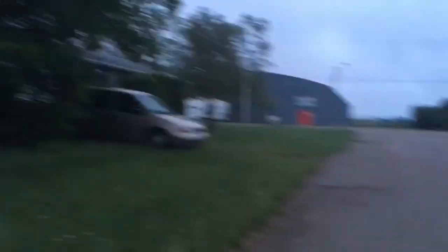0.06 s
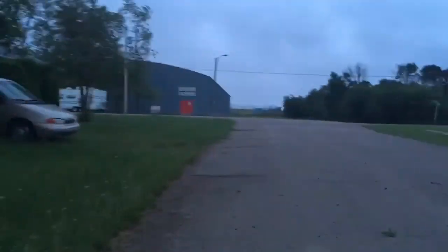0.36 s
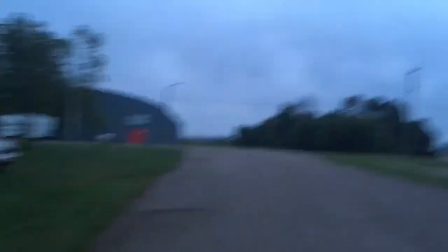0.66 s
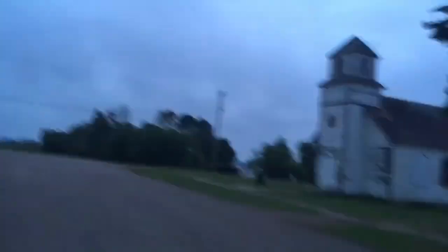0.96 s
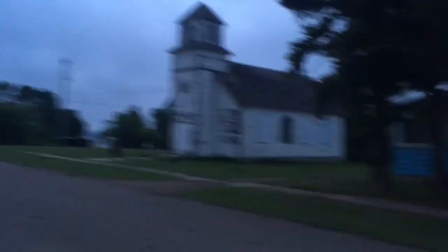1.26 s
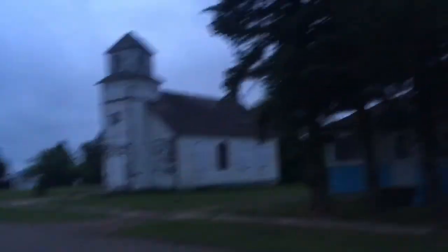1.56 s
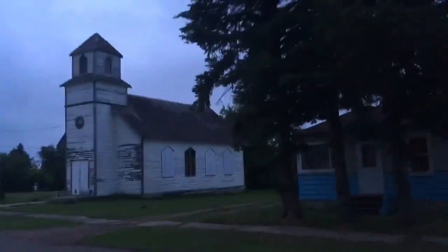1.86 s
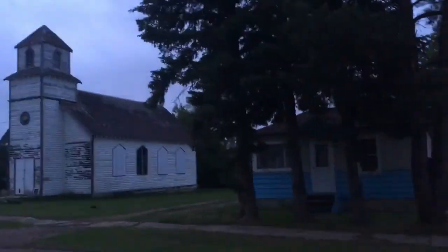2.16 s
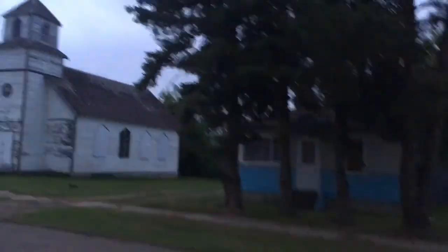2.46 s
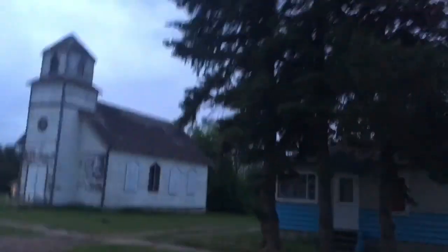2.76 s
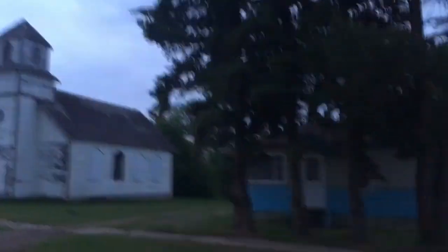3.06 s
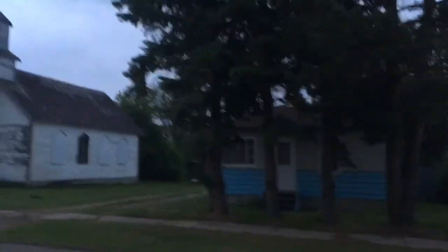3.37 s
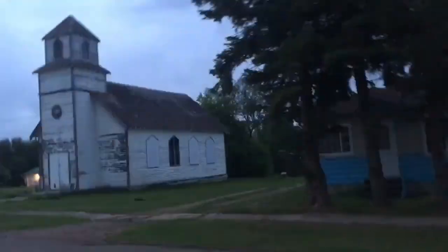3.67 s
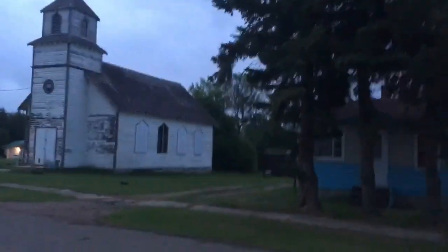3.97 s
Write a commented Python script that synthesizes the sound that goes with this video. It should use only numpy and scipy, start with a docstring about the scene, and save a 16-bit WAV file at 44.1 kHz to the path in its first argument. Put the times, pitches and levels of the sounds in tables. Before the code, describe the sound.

Gusty wind rumbles and thumps on the microphone, with trees rustling behind it.

```python
"""Two hard knocks and a low rumble come first: wind buffets a small mono microphone near the ground.
The rumble breaks into a rough flutter in the stronger puffs, and single eddies thump on the port.
Behind this the same gust builds in tall conifers and leafy trees: boughs roar, needles hiss and
leaves rustle, then it eases a little."""
import sys
import numpy as np
from scipy import signal
from scipy.fft import rfft, irfft
from scipy.io import wavfile
from scipy.ndimage import uniform_filter1d

SR = 44100
rng = np.random.default_rng(int(sys.argv[2]) if len(sys.argv) > 2 else 0)


def master(y):
    """Save y as 16-bit WAV."""
    cut = np.clip(np.atleast_2d(y).T, -1, 1)
    pcm = np.round(cut * 32767)  # scale
    wavfile.write(sys.argv[1], SR, pcm.astype(np.int16))


N = 176400


def buffeting():
    """Turbulent pressure on the port: a puffing rumble, a ragged flutter and one hollow burble."""
    # strength of the buffeting: t/s, rumble level/dB, flutter level/dB
    strength = [(0, -32, -38), (.06, -22, -34.5), (.11, -28.5, -35.5), (.2, -37.5, -54), (.325, -36.5, -55),
                (.357, -24, -31), (.385, -38, -49), (.6, -36, -56.5), (.94, -37, -52), (.975, -27.5, -29),
                (1.015, -31.5, -39), (1.12, -31, -42), (1.18, -24, -35.5), (1.24, -29, -36),
                (1.275, -24, -31), (1.31, -22, -27), (1.355, -32, -47.5), (1.39, -33.5, -32),
                (1.44, -27.5, -30), (1.485, -36, -48), (1.555, -43, -41), (1.6, -26, -27),
                (1.635, -42, -45), (1.662, -25, -26), (1.72, -34, -40.5), (1.752, -21, -26),
                (1.79, -24, -31), (1.837, -31, -65), (1.865, -33, -25.5), (1.92, -28, -39),
                (1.96, -23, -31.5), (2, -32, -30.5), (2.09, -29, -45), (2.15, -26.5, -33.5),
                (2.205, -40, -67), (2.275, -34, -36), (2.375, -30.5, -41.5), (2.45, -27.5, -54),
                (2.49, -38, -48), (2.69, -34.5, -54), (2.765, -30, -39), (2.795, -24, -64),
                (2.85, -47, -64), (3.13, -37.5, -48), (3.39, -41.5, -55), (3.44, -20.5, -32.5),
                (3.52, -33, -43), (3.67, -32, -40), (3.715, -44, -56), (3.91, -46.5, -59),
                (3.965, -26.5, -48), (4, -34.5, -68)]
    # spectra of the three pressure fluctuations: f/Hz, relative spectral level/dB
    rumble_colour = [(30, -63), (43, 2), (76, 6.5), (120, -2.5), (220, -7), (320, -14.5), (500, -27.5),
                     (1000, -64)]
    flutter_colour = [(80, -65), (200, 1), (320, 0.5), (520, 0), (700, -7.5), (900, -14.5), (1300, -19),
                      (2000, -26), (3500, -69)]
    burble_colour = [(90, -7), (160, 2.5), (205, 3), (290, -7), (400, -6.5), (520, -16), (900, -53)]
    t = np.arange(N) / SR
    rumble_db, flutter_db = curves(strength)
    puffs = unit(undb(4.5 * np.tanh(2 * drift(50))))
    rumble = steady(noise(rumble_colour)) * puffs * undb(rumble_db + 2.5)
    roughness = undb(4.5 * drift(220))
    flutter = steady(noise(flutter_colour) * roughness) * undb(flutter_db + 1.5)
    # the port burbles while the air blows straight across it
    start_s, end_s, fade_s = 3.43, 3.695, 0.022
    crossflow = np.clip(np.minimum(t - start_s, end_s - t) / fade_s, 0, 1)
    burble = steady(noise(burble_colour)) * crossflow * undb(-25)
    return rumble + flutter + burble


def eddies():
    """Convected vortices: each pushes, then sucks at the port; small ones pass faster and sound higher."""
    # eddies that hit the port: t/s, f/Hz, peak level/dB
    passages = [(0.063, 332, -12), (0.0806, 119, -15.5), (.189, 115, -22), (.23, 177, -20.5),
                (0.283, 156, -26.5), (.371, 92.5, -18.5), (.42, 177, -23.5), (.459, 143, -21.5),
                (0.5187, 146, -21.5), (0.586, 92, -20), (0.6955, 207, -25.5), (0.9709, 554, -22),
                (1.176, 330, -19), (1.184, 139, -15), (1.196, 444, -18.5), (1.2069, 436, -17),
                (1.2714, 206, -10.5), (1.316, 304, -9), (1.328, 123, -11.5), (1.5983, 262, -13.5),
                (1.6544, 350, -17), (1.704, 156, -15.5), (1.7332, 400, -14), (1.7629, 142, -11.5),
                (1.778, 567, -13), (1.7946, 590, -7), (1.862, 600, -17.5), (1.9931, 380, -14),
                (2.047, 226, -17), (2.585, 82, -13), (2.764, 525, -19), (2.768, 186, -15.5),
                (3.297, 151, -24.5), (3.347, 164, -28), (3.48, 242, -13.5), (3.5612, 195, -13),
                (3.6305, 208, -9.5)]
    falloff = 4.1  # how steeply the pressure dies away from the core
    t, out = np.arange(N) / SR, np.zeros(N)
    for at, hz, peak_db in passages:
        near = np.abs(t - at) < 2 / hz
        cycles = hz * (t[near] - at)
        pressure = -np.sin(2 * np.pi * cycles) / (1 + cycles ** 2) ** falloff
        out[near] += undb(peak_db) * pressure / np.abs(pressure).max()
    return out


def knocks():
    """Impulse response: each push rings the housing's damped modes, dull or bright by its band edge."""
    # knocks on the microphone: t/s, upper band edge f/Hz, peak level/dB
    pushes = [(0.0477, 895, -3), (0.0667, 1600, -2), (1.7912, 1900, -16.5)]
    # modes of its housing: f/Hz, decay time T60/s, relative level/dB
    modes = [(333, 0.017, -5.5), (565, 0.0048, 4), (1070, 0.0098, 0)]
    t, out = np.arange(N) / SR, np.zeros(N)
    for at, edge_hz, peak_db in pushes:
        age = np.clip(t - at, 0, .1)
        ring = sum(undb(db - 60 * age / t60) * np.sin(2 * np.pi * hz * age) for hz, t60, db in modes)
        band = signal.butter(4, [100, edge_hz], "band", fs=SR, output="sos")
        ring = signal.sosfilt(band, ring + 1e-18)
        out += undb(peak_db) * ring / np.abs(ring).max()
    return out


def trees():
    """Flow noise: boughs, needles and leaves each swell with the gust and flicker a little on their own."""
    # wind in the crowns: t/s, then relative level/dB of boughs, needles and leaves
    gust = [(0, -1, -14.5, -13.5), (.15, -8.5, -14, -14), (.55, -6, -14, -14), (.78, -4.5, -10.5, -14.5),
            (1.1, -5, -11, -13), (2.1, -1, -5.5, -5.5), (2.48, 0.5, -3.1, -1), (3.04, 0.9, -0.7, -0.5),
            (3.38, 2, -2.5, -3), (3.62, -1.5, -7, -6), (4, 1, -4.5, -4)]
    # where the band of each of the three has full weight: f/Hz
    band_hz = [1060, 2400, 9600]
    # spectrum of the trees: f/Hz, relative spectral level/dB
    colour = [(40, 0.5), (100, 4.5), (250, -5.5), (800, -5), (1700, -2), (2200, 0.5), (2600, 1.3),
              (2950, -2), (4000, -6), (4900, -11), (5400, -9), (6300, -8.5), (7600, -14.5), (9000, -13.5),
              (10400, -17), (11500, -15.5), (15500, -17)]
    base_db, flicker_db = -32.5, 0.64
    spectrum, out = rfft(noise(colour)), 0
    for gust_db, selector in zip(curves(gust), np.eye(len(band_hz))):
        weight = np.interp(log_bins(), np.log(band_hz), selector)  # neighbouring bands crossfade
        band = irfft(spectrum * weight, N)
        out = out + band * undb(base_db + gust_db + flicker_db * drift(60))
    return out


def undb(db):
    """Amplitude ratio of a level in decibels."""
    return 10 ** (np.asarray(db) / 20)


def unit(x):
    """Normalisation to an rms of 1."""
    return x / np.sqrt(np.mean(x ** 2))


def curves(table):
    """Linear interpolation in time of each column of a table."""
    times, *columns = np.array(table).T
    return [np.interp(np.arange(N) / SR, times, column) for column in columns]


def log_bins():
    """Logarithmic frequency of every spectral bin."""
    return np.log(np.maximum(np.fft.rfftfreq(N, 1 / SR), 1))


def noise(colour):
    """Spectral shaping of white noise through points of f/Hz, level/dB."""
    hz, db = np.array(colour).T
    gain = undb(np.interp(log_bins(), np.log(hz), db))
    return unit(irfft(rfft(rng.standard_normal(N)) * gain, N))


def drift(rate_hz):
    """Random modulation: smoothed steps with an rms of 1."""
    width = max(int(SR / rate_hz), 2)
    steps = np.repeat(rng.standard_normal(N // width + 1), width)
    return unit(uniform_filter1d(uniform_filter1d(steps, width), width)[:N])


def steady(x):
    """Division by the running rms evens out slow swells and keeps the fast grain."""
    width = int(.05 * SR)
    power = uniform_filter1d(uniform_filter1d(x ** 2, width), width // 2)
    return x / np.sqrt(power + 1e-9)


def scene():
    """Superposition of the trees and the wind on the microphone, the same in both channels."""
    return np.tile(trees() + buffeting() + eddies() + knocks(), (2, 1))


def record(dry):
    """Band limiting: a steep low-pass cuts the top."""
    top_hz = 15800
    return signal.sosfilt(signal.ellip(10, .1, 80, top_hz, fs=SR, output="sos"), dry)


dry = scene()
out = record(dry)
master(out)
```